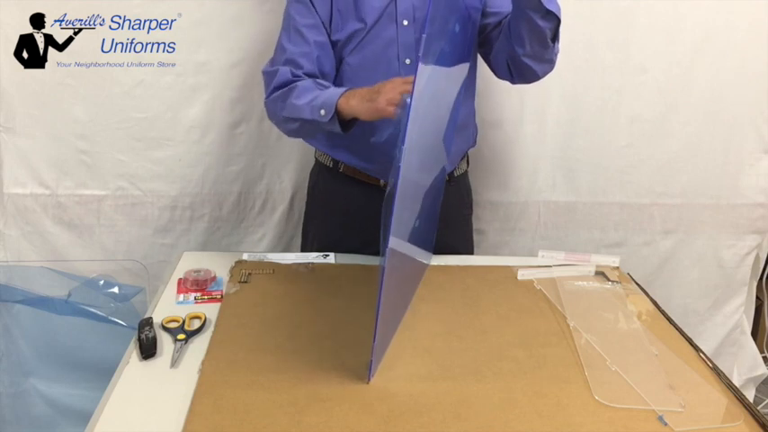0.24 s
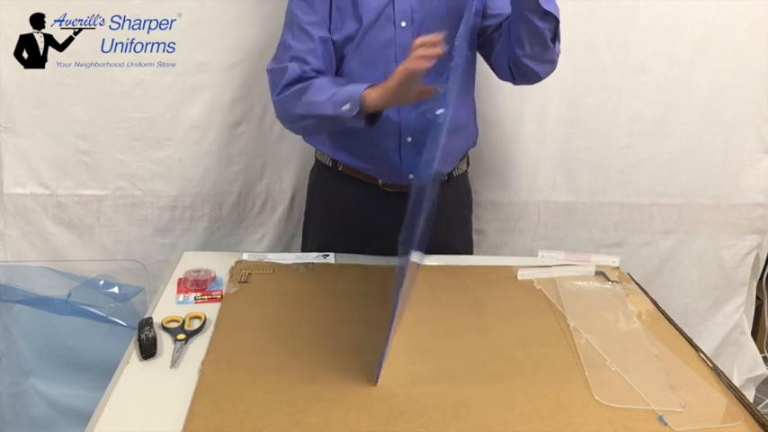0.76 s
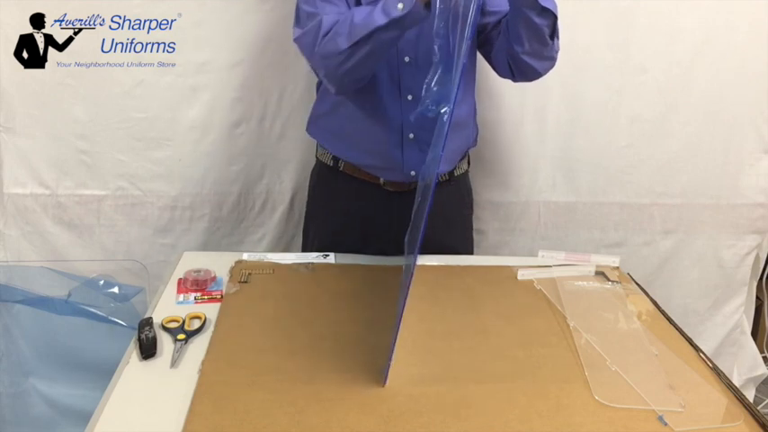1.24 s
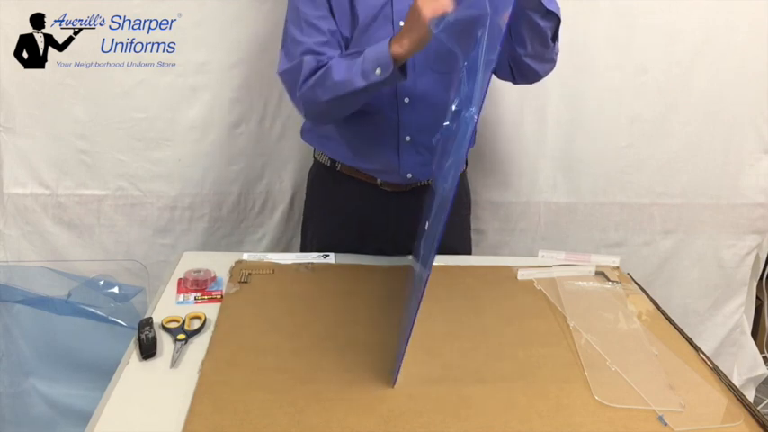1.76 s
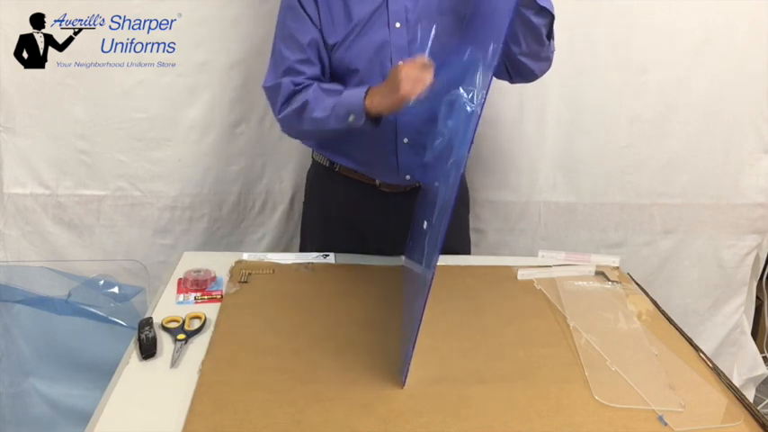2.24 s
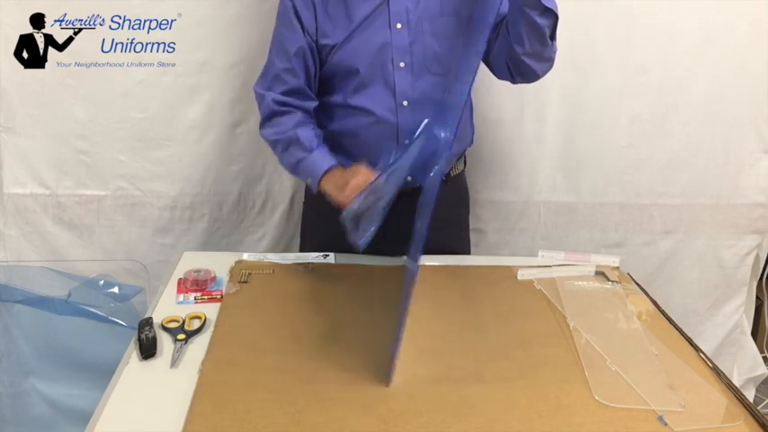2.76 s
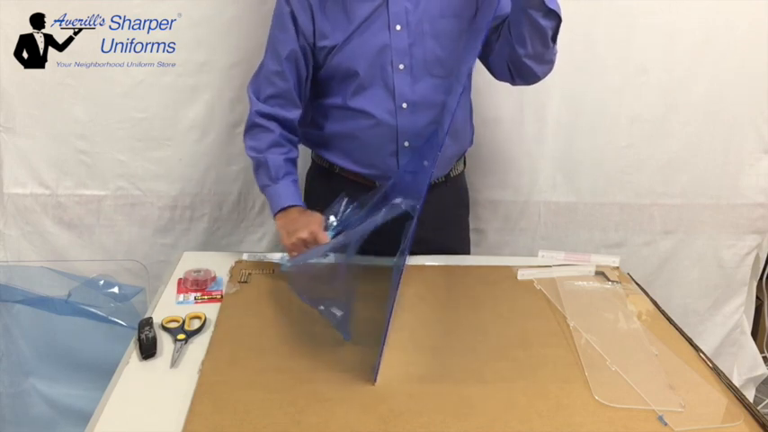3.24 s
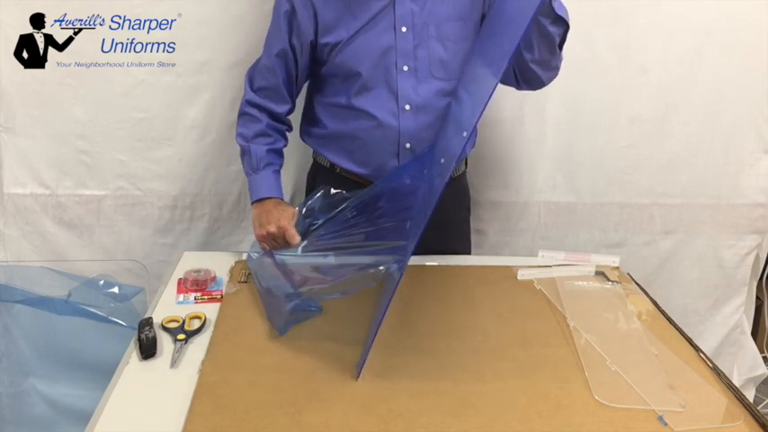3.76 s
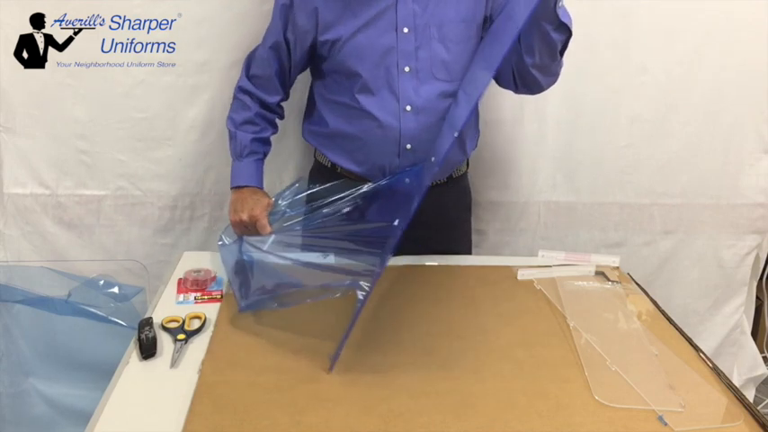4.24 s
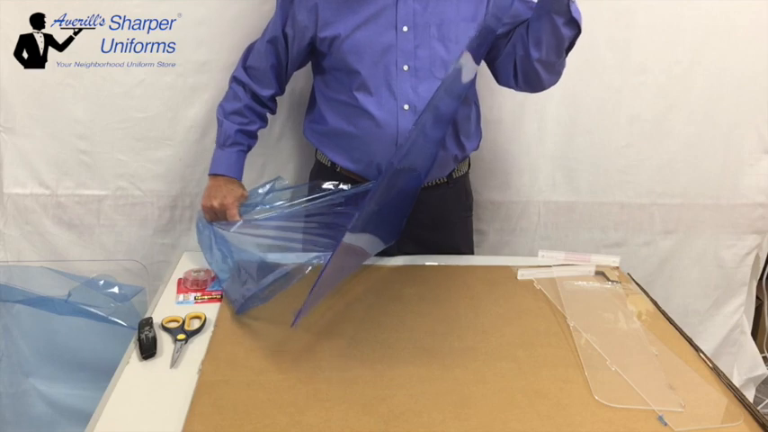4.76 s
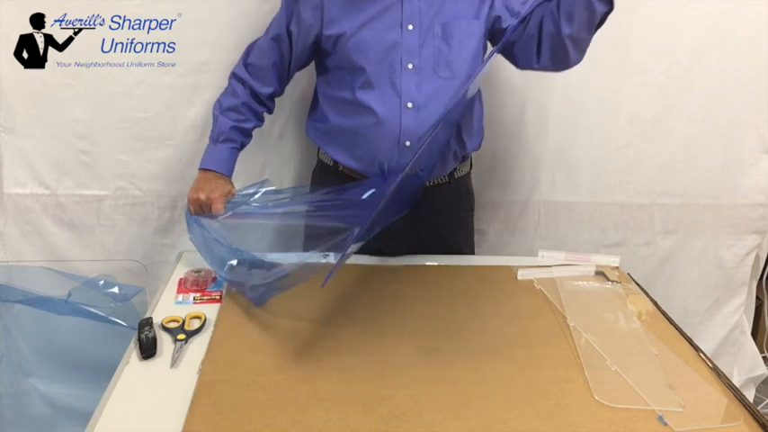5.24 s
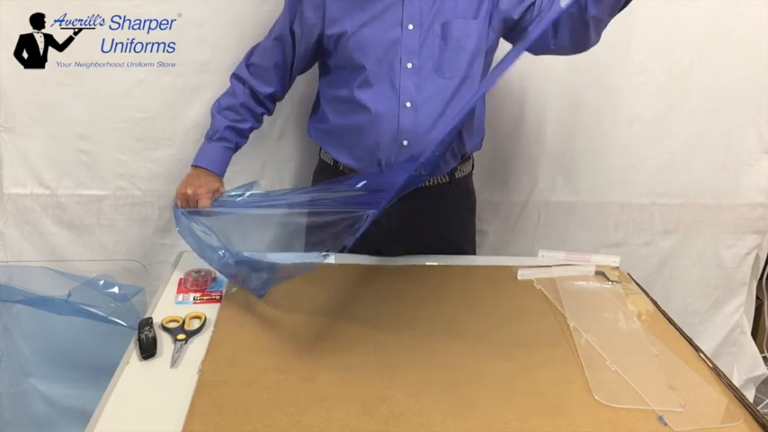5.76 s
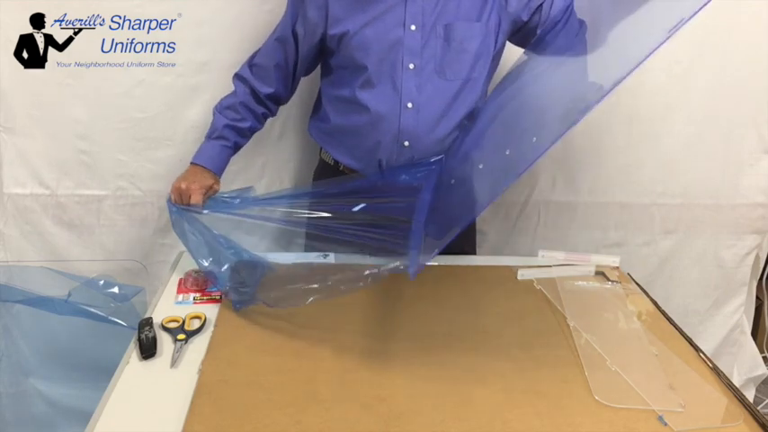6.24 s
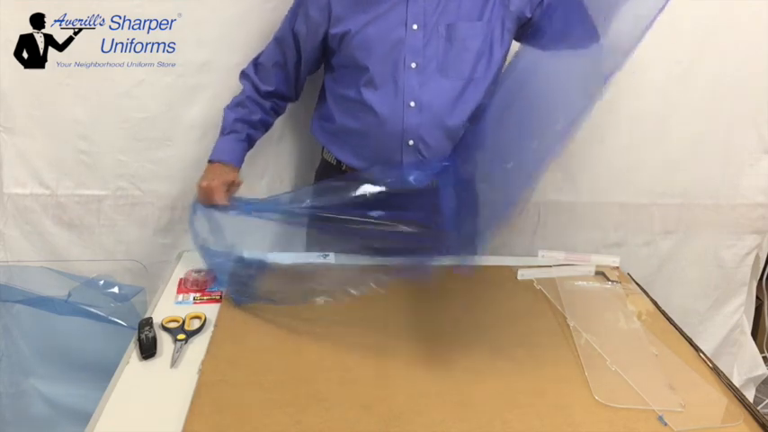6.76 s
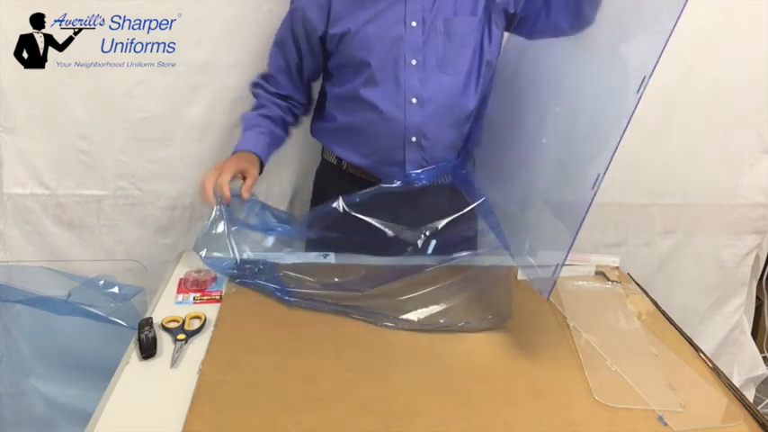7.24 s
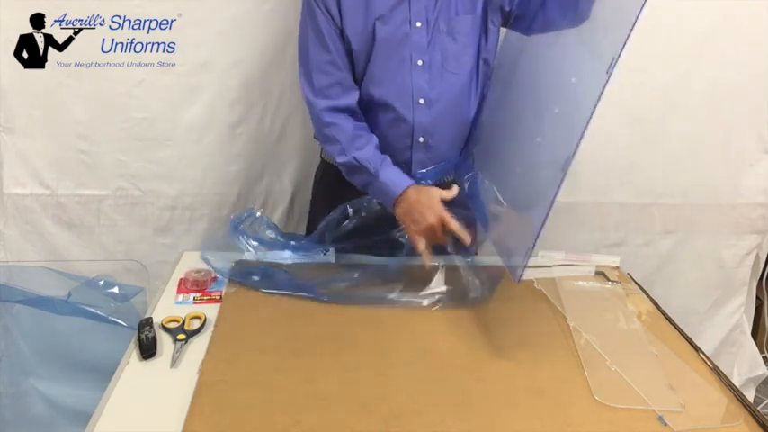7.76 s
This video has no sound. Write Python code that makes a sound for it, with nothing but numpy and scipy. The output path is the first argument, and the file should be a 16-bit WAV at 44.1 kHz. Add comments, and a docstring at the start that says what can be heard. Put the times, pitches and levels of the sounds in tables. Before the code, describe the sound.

Sticky film rips away in bright, dry tugs, then bunches with sharp crinkles and dull pops, with a brief edge thump and faint motor hum.

```python
"""In a small room, protective film is peeled off a large plastic panel standing on a table.
Adhesive rupture is heard as dense tiny clicks that excite short film resonances; buckling creases
give sharp noise bursts, turning folds dull pops, and resonant noise gives rubs and hollow tones.
Bumps and drags of the edge ring the panel's low modes. Wavering sines form a motor's steady hum
over filtered air noise. Echoes from nearby surfaces, table and walls surround the film."""
import sys
import numpy as np
from scipy import signal
from scipy.fft import rfft, irfft, next_fast_len
from scipy.io import wavfile

SR = 44100
rng = np.random.default_rng(int(sys.argv[2]) if len(sys.argv) > 2 else 0)


def inscribe(sig):
    """Save sig as 16-bit PCM at rate SR to the path in sys.argv[1].

    A 1-D sig is mono; a 2-D sig holds one channel per row.
    Samples are clipped to [-1, 1] before scaling.
    """
    pcm = np.round(np.clip(np.atleast_2d(sig).T, -1, 1) * 32767)
    wavfile.write(sys.argv[1], SR, pcm.astype(np.int16))


N = 352844  # samples, about 8 s

# Levels in the tables are relative where a function adds its own trim.
# Tugs of the hand at the film: start_s, length_s, level_db, brightness_db
HAND_TUGS = [(-.03, 0.29, -47, 8), (0.263, 0.033, -42, 5.5), (0.438, 0.033, -47, 8),
             (0.741, 0.038, -50.5, -9), (1.104, 0.14, -57, 0.5), (1.275, .1, -40.5, -3),
             (1.42, 0.098, -36, -1), (1.541, 0.24, -39.5, -1.5), (1.793, 0.24, -47, 0.5),
             (1.913, 0.041, -43, 4), (2.044, 0.16, -44.5, 3), (2.184, 0.1, -41, 1),
             (2.42, 0.073, -47.5, -1), (2.641, 0.29, -47, 4), (2.77, 0.073, -43, 4),
             (3.35, 0.26, -46.5, -2), (3.41, 0.077, -40.5, -8.5), (3.938, 0.21, -48.5, -0.5),
             (4.438, 0.2, -49, -0.5), (4.523, 0.062, -51, 1), (5.221, 0.033, -53, -9),
             (5.315, 0.041, -61.5, -23), (5.41, 0.019, -52.5, 2), (5.883, 0.09, -50.5, -3),
             (6.08, 0.095, -50, 3.5), (6.358, 0.055, -51.5, 5), (6.675, 0.42, -45.5, -2.5),
             (6.918, 0.045, -47.5, -3), (7.063, .14, -41, -3), (7.21, 0.055, -41, -2.5),
             (7.383, 0.029, -51, -5), (7.657, 0.048, -35.5, -3.5), (7.737, 0.34, -39, -.5),
             (7.962, 0.046, -36, -7)]
# Creep of the film under steady tension between tugs: time_s, level_db, brightness_db
STEADY_CREEP = [(0, -47, -2), (.38, -55.5, 8.5), (.58, -59.5, -4), (.7, -45.5, 1.5), (.9, -64, -8),
                (1.07, -75, -3), (1.4, -52.5, -2), (2.3, -49, 3.5), (3.1, -50.5, 2.5), (3.9, -53, 3),
                (4.3, -55.5, 2), (4.8, -57.5, 2), (5.35, -56.5, 3), (6.3, -59, -2), (6.62, -59.5, -4),
                (7.3, -59, -8), (7.5, -70, -6), (7.6, -53.5, -5)]
# Slack and creasing of the film: time_s, crinkle_against_peel_db
FILM_SLACK = [(0, -18), (.45, -7.5), (.8, -16), (1.2, -15), (1.4, -5.5), (2.5, -1.5), (4.5, -3.5),
              (5.1, 0.5), (6.4, -1.5), (6.8, -3), (8, -3.5)]
# Spectral colour of the film: frequency_hz, density_db (per Hz)
FILM_COLOUR = [(150, -3.5), (280, 1), (450, 1.5), (620, -1.5), (820, 0.5), (1100, -1), (2000, 1),
               (4400, 0.5), (8000, -5), (13400, -6), (15200, -8.5), (16000, -33)]
# Timed creases that snap through, strong and weak: time_s, strength_db, length_s, treble_over_mids_db
TIMED_SNAPS = [(0.283, -3, 0.00016, 26), (0.292, -4.5, 0.00015, 11), (0.3806, -11.5, .0002, 17),
               (0.48, -11, 0.00026, 9), (0.6323, -11, .0001, 7), (0.726, -20, .0002, -1),
               (.7445, -8.5, 0.00025, -10), (.772, -8, .00075, -7), (0.783, -13, 0.00076, -12),
               (1.2, -20.5, .0001, -29), (1.38, -12, 0.00044, -3), (1.45, -11, .0006, 11),
               (1.469, -8, .0001, 6), (2.066, -4.5, .0013, 3), (2.244, -4, 0.0013, 17),
               (2.435, -3, .0017, 2.5), (2.463, -6, .0001, 17), (2.494, 3.5, 0.00088, 7.5),
               (2.51, -5, 0.000089, 11), (2.586, -14, .0001, 23), (2.6169, -6.5, .0001, 16),
               (2.671, -2.5, .0001, 22), (2.762, -9.5, 0.0013, -1), (2.915, -4.5, 0.000083, 17),
               (2.945, -13, .0001, 15), (2.9727, -8, 0.00011, 16), (3.038, -13, .0001, 18),
               (3.118, -16, .0001, 14), (3.246, -4.5, .0001, 7), (3.3363, -16, 0.00027, -7),
               (3.3664, -12, 0.00056, -2), (3.4363, -4.5, .00045, 1), (3.488, -6.5, 0.00071, -7),
               (4.082, -11, .0001, 2), (4.134, -13, .0001, 17), (4.1515, -14.5, .0001, 11),
               (4.3623, -18, .00026, 0), (4.452, -17, 0.00081, -10), (4.6336, -13.5, .0001, 14),
               (4.766, -19, 0.0012, 18), (4.8377, -11.5, .0002, 8), (5.026, -13, 0.00027, -3),
               (5.251, -11.5, 0.00049, 0), (5.437, -15, .0003, 21), (5.598, -11, 0.0016, 5),
               (5.8963, -12.5, .0004, -10), (5.922, -13.5, 0.00057, 3.5), (6.0256, -12.5, .0001, 26),
               (6.0565, -4.5, 0.00041, 9), (6.107, -11.5, .0001, 16), (6.1738, -6.5, .0001, 8),
               (6.2678, -7, .0002, 11), (6.374, -12, .0011, 10), (6.493, -12.5, .0001, 21),
               (6.512, -6, 0.00011, 0), (6.561, -18, 0.0008, 3), (6.8817, -10.5, .0005, -1),
               (7.117, -10, .0001, -5), (7.1524, -5, 0.00052, -2), (7.236, -8.5, .0013, -6),
               (7.418, -16, 0.0017, -8), (7.529, -19, 0.00053, -14), (7.594, -14, 0.00021, -15),
               (7.6843, -5, 0.0018, -20)]
# Wide folds that flip over with a dull pop: time_s, level_db, pitch_hz
FOLD_POPS = [(1.335, -35, 850), (4.928, -40.5, 700), (5.241, -36, 1390), (5.74, -37, 600),
             (5.868, -33.5, 710), (5.897, -29.5, 900), (5.932, -31.5, 560), (5.975, -36.5, 900),
             (6.56, -34.5, 800), (7.15, -38, 875), (7.235, -26, 980), (7.662, -29, 1290), (7.684, -18, 830)]
# Short coloured film noises: rubs, hollow pocket resonances and one bright snap:
# start_s, length_s, pitch_hz, width_hz, level_db
COLOURED_NOISES = [(.762, 0.059, 3400, 1500, -38), (.83, 0.18, 3100, 1200, -61.5),
                   (1.285, 0.11, 830, 140, -49), (1.33, 0.1, 2180, 600, -49.5),
                   (1.55, 0.16, 2230, 500, -48), (2.22, 0.11, 1360, 400, -44.5),
                   (3.47, 0.074, 3030, 500, -40.5), (4.45, 0.018, 5540, 2500, -44),
                   (6.664, 0.028, 2660, 500, -49), (6.88, 0.33, 820, 200, -58.5)]
# Bumps of the panel's edge on the table: time_s, level_db
EDGE_BUMPS = [(3.432, -25), (3.445, -29.5), (3.472, -38), (3.485, -20.5), (3.5, -25.5), (3.546, -29.5)]
# Drags of the panel's edge on the table: start_s, length_s, level_db
EDGE_DRAGS = [(2.756, 0.15, -46), (3.40, 0.11, -39.5), (3.95, 0.19, -54)]
# Modes of the panel on the table: frequency_hz, level_db, t60_s
PANEL_MODES = [(81, -14.5, 0.67), (96, -3.5, 0.24), (166.4, 0.5, 0.23), (192.4, -2, 0.29),
               (220.3, -3.5, 0.35), (265, -2, 0.11), (314, -10, 0.13), (376, -9, 0.28), (428, -3.5, 0.12),
               (488, -14.5, 0.1), (563, -17, .2), (663, -18, 0.15)]
# Dragged edge locked onto a panel mode: start_s, length_s, pitch_hz, level_db
EDGE_GROANS = [(3.465, 0.082, 376, -33), (3.546, 0.088, 371, -45.5), (3.959, 0.313, 376.5, -55)]
# Partials of the motor hum: frequency_hz, level_db (rms)
HUM_PARTIALS = [(125, -49.5), (99.8, -62.5), (163.2, -63), (193, -70.5)]
# Spectrum of ventilation rumble and hiss: frequency_hz, density_db (per Hz)
AIR_COLOUR = [(20, -30), (40, -23), (60, -14.5), (85, -7.5), (125, -6), (170, -5.5), (230, -8.5),
              (320, -17.5), (500, -18.5), (1000, -21.5), (3000, -32), (8000, -34.5), (16000, -37)]
# Chosen stereo width: frequency_hz, side_against_mid_db
STEREO_WIDTH = [(50, -22), (125, -22), (300, -18), (600, -16), (1200, -20), (2200, -40), (4000, -31),
                (9500, -28), (12500, -13), (15500, -27)]

TUG_ATTACK_S, TUG_RELEASE_DB_PER_S = 0.028, 173
DRAG_ATTACK_S, DRAG_RELEASE_DB_PER_S = 0.046, 145
BODY_LOSS = 0.67  # dB of body lost for each dB of brightness
USUAL_PULL_DB = -46
# Small creases: mean rate, level, spread, and dB gained per dB of harder pull
SMALL_SNAPS_PER_S, SMALL_SNAP_DB, SMALL_SNAP_SPREAD_DB, SMALL_SNAP_FOLLOWS = 20, -15.5, 2.5, 0.44
SMALL_SNAP_S, SMALL_SNAP_TREBLE_DB = 0.00037, 7.5
ROOM_T60_S, CUTOFF_HZ = 0.34, 16100


def pulling():
    """Power addition: tugs and creep combine into body, rasp and sizzle levels in dB."""
    lean = np.array([[-BODY_LOSS], [0], [1]])  # a bright pull has less body and more sizzle
    creep_db, creep_bright_db = in_time(STEADY_CREEP)
    power = from_db(creep_db + lean * creep_bright_db) ** 2
    for start, length, db, bright_db in HAND_TUGS:
        envelope = stroke(start, length, TUG_ATTACK_S, TUG_RELEASE_DB_PER_S)
        power = power + (from_db(db + lean * bright_db) * envelope) ** 2
    return 10 * np.log10(power)


def peel(body, rasp, sizzle, slack, glue_db=2.0, body_db=-7.5, rasp_db=-1.0, sizzle_db=-0.5,
         slip_db=2.1, crinkle_db=0.0, flutter_db=1.0, flutter_t60=.012):
    """Adhesive rupture: threads break faster under a harder pull; slack film crinkles in clumps."""
    pull = from_db(.8 * (rasp - USUAL_PULL_DB))
    glue_ticks = ticks(5000 * pull, spread_db=2.5, largest=3.8)
    glue = facets(glue_ticks, cycles=3.6, crack=0.99)
    glue *= from_db(glue_db + slip_db * drift(170))  # the peel line sticks and slips

    clumped_rate = 110 * from_db(3 * drift(40))
    creases = facets(ticks(clumped_rate, spread_db=5.0, largest=1.6), cycles=2.3, crack=0.63)
    creases += from_db(flutter_db) * scatter(creases, flutter_t60, .0002, hop=512)

    film = colour(glue + from_db(slack + crinkle_db) * rms_one(creases), FILM_COLOUR)
    film = cut(film, 240, "high", order=2)
    upper = cut(film, 1570, "high")
    bands = cut(film, 1316, "low"), cut(upper, 5990, "low"), cut(upper, 6500, "high")
    levels = body + body_db, rasp + rasp_db, sizzle + sizzle_db
    return sum(rms_one(band) * from_db(level) for band, level in zip(bands, levels))


def ticks(per_s, spread_db, largest):
    """Random impulses: many small clicks and a few large ones, with a mean power of 1."""
    loudness_db = spread_db * np.minimum(rng.exponential(1, N), largest)
    sizes = from_db(loudness_db) * rng.choice([-1, 1], N)
    happens = rng.random(N) < per_s / SR
    return rms_one(sizes * happens / np.sqrt(per_s))


def facets(clicks, cycles, crack, count=20):
    """Modal ringing: each click cracks and briefly rings a film facet of randomly chosen size."""
    dealt, out = rng.integers(0, count, N), 0
    for k, hz in enumerate(np.geomspace(650, 15000, count)):
        tone = np.diff(ring(clicks * (dealt == k), hz, cycles / hz), prepend=0)
        out = out + (-1) ** k * tone
    return rms_one(rms_one(out) + crack * rms_one(clicks))


def snaps(rows, snap_db=-0.22, split_hz=5200, low_hz=1000, tilt_db=1.5, size=1400, count=500):
    """Buckling: a sharp crack; a long crease runs on in a burst, and the sheet flutters after it."""
    out, t = np.zeros(N + size), np.arange(size) / SR
    for (s, db, length, treble), noise in zip(rows, rng.standard_normal((count, 2, size))):
        run = noise[0] * np.exp(-t / max(1.3 * length, 1 / SR)) * (1 - np.exp(-t / .0003))
        run[0] = 3.7  # the initial crack
        flutter = .25 * rms_one(noise[1] * np.exp(-t / .002))
        crack = cut(rms_one(run) + flutter, low_hz, "high", order=1)
        mids = rms_one(cut(crack, split_hz, "low", order=2))
        top = rms_one(cut(crack, split_hz, "high", order=2))
        crack = cut(mids - from_db(treble + tilt_db) * top, 430, "high", order=2)
        # only the part below the cutoff counts as strength
        strength = np.linalg.norm(cut(crack, CUTOFF_HZ, "low", order=8))
        at = int(np.clip(round(s * SR), 0, N))
        out[at:at + size] += from_db(db + snap_db) * crack / strength
    return out[:N]


def small_snaps(pull_db, bright_db, slack_db, treble_spread_db=5.0, count=400):
    """Random buckling: louder with pull and slack, brighter with a bright pull; rows as TIMED_SNAPS."""
    chance, shape = rng.random((count, 2)), rng.standard_normal((count, 3))
    at = (chance[:, 0] * N).astype(int)
    pull_gain_db = SMALL_SNAP_FOLLOWS * (pull_db[at] - USUAL_PULL_DB)
    db = SMALL_SNAP_DB + pull_gain_db + slack_db[at] + SMALL_SNAP_SPREAD_DB * shape[:, 0]
    length_s = SMALL_SNAP_S * 2 ** shape[:, 1]
    treble_db = SMALL_SNAP_TREBLE_DB + bright_db[at] + treble_spread_db * shape[:, 2]
    rows = np.column_stack([at / SR, db, length_s, treble_db])
    return rows[chance[:, 1] < SMALL_SNAPS_PER_S * N / SR / count]


def folds(fold_db=-10.5, decay_s=0.008, size=3000):
    """Volume displacement: a wide fold pushes more air than a crease and dies quickly."""
    out, t = np.zeros(N + size), np.arange(size) / SR
    for (s, db, hz), noise in zip(FOLD_POPS, rng.standard_normal((len(FOLD_POPS), size))):
        dull = cut(noise * np.exp(-t / decay_s), hz * 1.33, "low", order=2)
        pop = cut(dull, hz / 2.0, "high", order=2)
        at = round(s * SR)
        out[at:at + size] += from_db(db + fold_db) * pop / np.linalg.norm(pop) * np.sqrt(decay_s * SR)
    return out[:N]


def coloured_noises(rows, per_s, gain_db):
    """Resonant excitation: uneven impulses drive one resonance, swelling fast and easing off."""
    out = np.zeros(N)
    impulses = ticks(per_s, spread_db=4.0, largest=14.0)
    for start, length, hz, width, db in rows:
        at, size = int(start * SR), int(length * SR)
        swell = np.sin(np.pi * np.linspace(0, 1, size) ** 0.65) ** 2
        t60 = np.log(1000) / (np.pi * width)  # a wide resonance dies sooner
        tone = ring(impulses[at:at + size], hz, t60)
        noise = cut(tone, hz / 2, "high", order=2) * np.sqrt(swell)
        out[at:at + size] += from_db(db + gain_db) * rms_one(noise)
    return out


def panel(bump_db=-6.0, drag_db=0.0):
    """Modal excitation: bumps and the dragging edge ring the same low panel modes."""
    s, db = np.transpose(EDGE_BUMPS)
    drag = sum(from_db(level) * stroke(start, length, DRAG_ATTACK_S, DRAG_RELEASE_DB_PER_S)
               for start, length, level in EDGE_DRAGS)
    knocked, rubbed = 0, 0
    for k, (hz, level_db, t60) in enumerate(PANEL_MODES):
        blows = np.zeros(N)
        blows[(s * SR).astype(int)] = from_db(db + level_db + rng.standard_normal(len(s)))
        knocked = knocked + (-1) ** k * ring(blows, hz, t60)
        # contact damps the panel
        rubbed = rubbed + from_db(level_db) * ring(rng.standard_normal(N), hz, t60 / 2)
    sound = from_db(bump_db) * knocked + from_db(drag_db) * drag * rms_one(rubbed)
    return cut(sound, 67, "high", order=5)  # a thin open panel radiates no deep bass


def groans(groan_db=-2.1, wobble_hz=3.6, flicker_db=3.0):
    """Mode locking: stick-slip in step with one mode gives a wavering, almost pure tone."""
    out = np.zeros(N)
    wobble, flicker = wobble_hz * drift(40), flicker_db * drift(30)
    for start, length, hz, db in EDGE_GROANS:
        at = int(start * SR)
        span = slice(at, at + int(length * SR))
        tone = np.sin(2 * np.pi * np.cumsum(hz + wobble[span]) / SR)
        swell = np.sin(np.linspace(0, np.pi, len(tone)))
        out[span] += from_db(db + groan_db) * rms_one(tone * swell * from_db(flicker[span]))
    return out


def motor(air_db=-56.0, waver_db=1.0, waver_hz=0.44):
    """Superposition: hum partials waver slightly in pitch and level over moving-air noise."""
    hum = 0
    for hz, db in HUM_PARTIALS:
        phase = 2 * np.pi * np.cumsum(hz + waver_hz * drift(5.07)) / SR
        level = np.sqrt(2) * from_db(db + waver_db * drift(5.7))  # rms to peak
        hum = hum + level * np.sin(phase)
    air = rms_one(colour(rng.standard_normal(N), AIR_COLOUR))
    return hum + from_db(air_db) * air


def room(x, table_s=0.0037, table_db=-13.0, near_t60=.018, tail_db=-10.5, wall_hz=9000):
    """Reflection: scatter from panel and body, a bounce off the table, and a short diffuse tail."""
    near = from_db(-9) * scatter(x, near_t60, .0006, hop=256)
    tail = scatter(x, ROOM_T60_S, .01, hop=4096)
    lag = table_s * SR * (1 + .06 * drift(3))  # the path changes as the hand moves
    bounce = x[np.clip(np.arange(N) - lag.astype(int), 0, N - 1)]
    return x + near + from_db(table_db) * bounce + from_db(tail_db) * cut(tail, wall_hz, "low", order=1)


def stereo(x, balance_db=0.08, side_db=0.0, treble_lean=0.036, lean_hz=9000):
    """Stereo width: scattered sound spreads to the sides, the right a little brighter."""
    diffuse = scatter(x, .02, .0005, hop=2048)
    treble = colour(x, [(lean_hz / 2, -40), (lean_hz, 0)])
    side = from_db(side_db) * colour(diffuse, STEREO_WIDTH) - treble_lean * treble
    left_right = np.array([[1], [-1]])
    return x * from_db(balance_db * left_right) + side * left_right


def scatter(x, t60, build_s, hop):
    """Diffuse reflection at unit power: film and panel move, so each block has a new echo pattern."""
    t = np.arange(int(min(t60, .35) * SR)) / SR
    padded = np.pad(x, (hop, 2 * hop))
    blocks = np.lib.stride_tricks.sliding_window_view(padded, 2 * hop)[::hop]
    blocks = blocks * signal.windows.cosine(2 * hop)  # overlapping blocks add up in power
    envelope = from_db(-60 * t / t60) * np.minimum(t / build_s, 1)
    echoes = rng.standard_normal((len(blocks), len(t))) * envelope
    echoes /= np.linalg.norm(echoes, axis=1, keepdims=True)
    out = np.zeros(len(padded) + len(t))
    for k, block in enumerate(signal.fftconvolve(blocks, echoes, axes=1)):
        out[k * hop:k * hop + len(block)] += block
    return out[hop:hop + N]


def stroke(start, length, attack_s, release_db_per_s):
    """Gesture envelope: one movement builds up linearly, holds and decays exponentially."""
    t = np.arange(N) / SR - start
    return np.clip(t / attack_s, 0, 1) * from_db(-release_db_per_s * np.clip(t - length, 0, 1))


def ring(x, hz, t60):
    """Damped resonance: a unit click sets a decaying sine of initial height 1 ringing."""
    r = from_db(-60 / (t60 * SR))
    w = 2 * np.pi * min(hz, .45 * SR) / SR
    return signal.lfilter([0, np.sin(w)], [1, -2 * r * np.cos(w), r * r], x + 1e-18)


def drift(rate):
    """Slow fluctuation: random knots, rate per second, joined by lines and scaled to unit power."""
    knots = rng.standard_normal(int(N / SR * rate) + 2)
    return rms_one(np.interp(np.arange(N) / SR * rate, np.arange(len(knots)), knots))


def colour(x, points):
    """Spectral shaping: gain in dB is interpolated over log frequency."""
    hz, db = np.transpose(points)
    size = next_fast_len(N + 4096)
    grid = np.maximum(np.fft.rfftfreq(size, 1 / SR), 1)
    gain = from_db(np.interp(np.log(grid), np.log(hz), db))
    return irfft(rfft(x, size) * gain, size)[..., :N]


def cut(x, hz, kind, order=3):
    """Band limiting: a Butterworth low- or high-pass filter."""
    sos = signal.butter(order, np.clip(hz, 10, .45 * SR), kind, fs=SR, output="sos")
    return signal.sosfilt(sos, x + 1e-18)


def in_time(rows):
    """Linear interpolation: the value columns of a time curve at every sample."""
    s, *columns = np.transpose(rows)
    return [np.interp(np.arange(N) / SR, s, c) for c in columns]


def rms_one(x):
    """Power normalisation: scale to unit mean square."""
    return x / np.sqrt(np.mean(x ** 2) + 1e-20)


def from_db(db):
    """Logarithmic level: decibels to amplitude gain."""
    return 10 ** (np.asarray(db) / 20)


def scene():
    """Superposition: film in its room, with panel, groans and motor, heard straight ahead."""
    body, rasp, sizzle = pulling()
    slack, = in_time(FILM_SLACK)
    film = peel(body, rasp, sizzle, slack) + folds()
    film = film + coloured_noises(COLOURED_NOISES, per_s=2800, gain_db=-1.0)
    film = film + snaps([*TIMED_SNAPS, *small_snaps(rasp, sizzle - rasp, slack)])
    return stereo(room(film) + panel() + groans() + motor())


def record(dry):
    """Band limiting: a zero-phase elliptic low-pass removes the top steeply."""
    sos = signal.ellip(10, .05, 60, CUTOFF_HZ, fs=SR, output="sos")
    return signal.sosfiltfilt(sos, dry)


dry = scene()
out = record(dry)
inscribe(out)
```